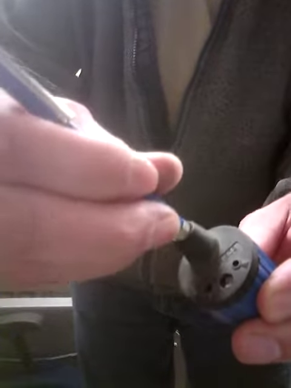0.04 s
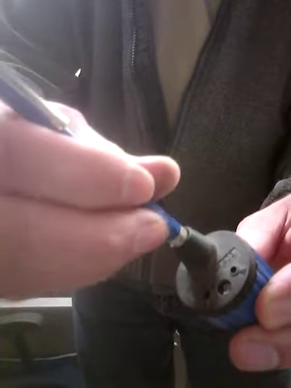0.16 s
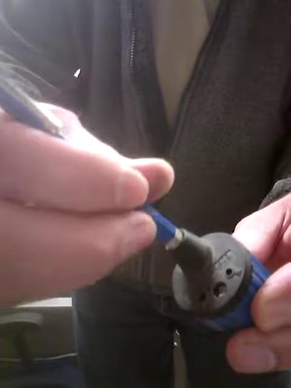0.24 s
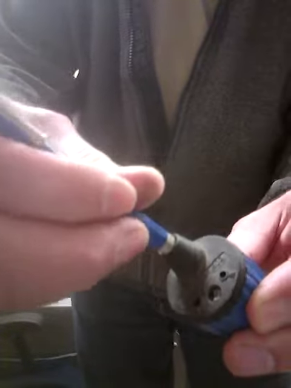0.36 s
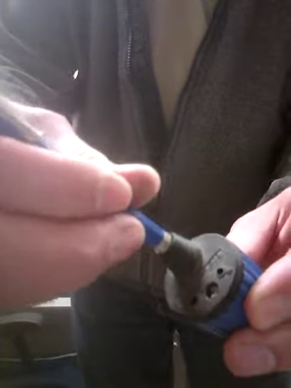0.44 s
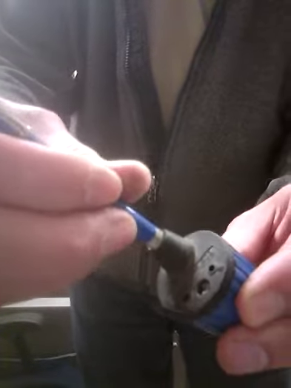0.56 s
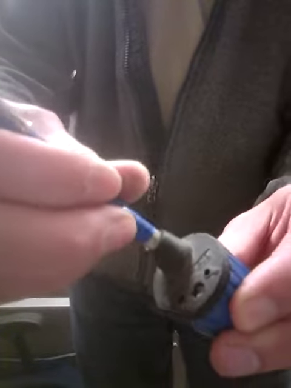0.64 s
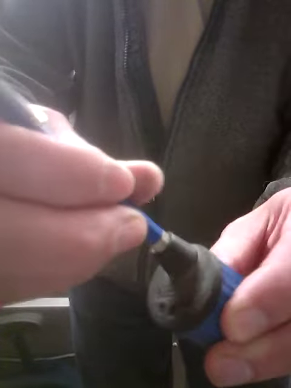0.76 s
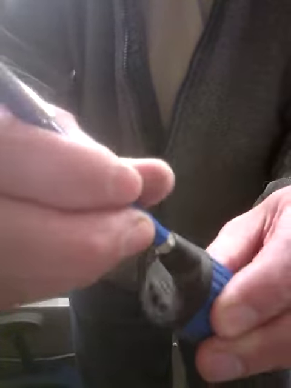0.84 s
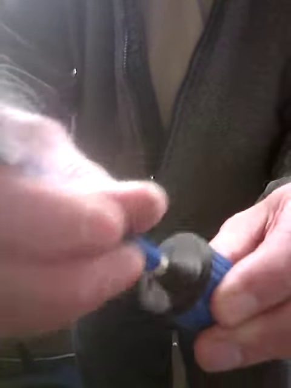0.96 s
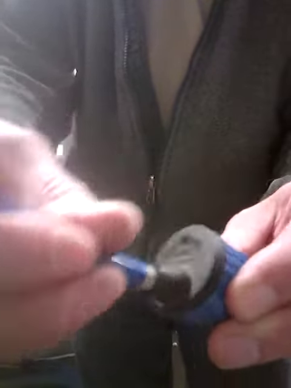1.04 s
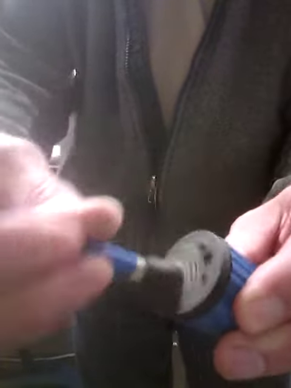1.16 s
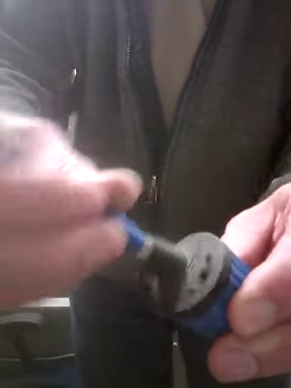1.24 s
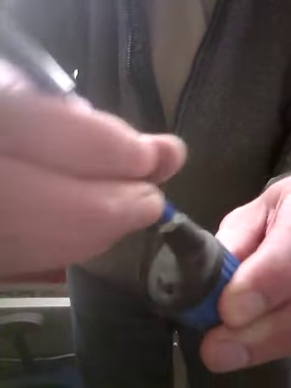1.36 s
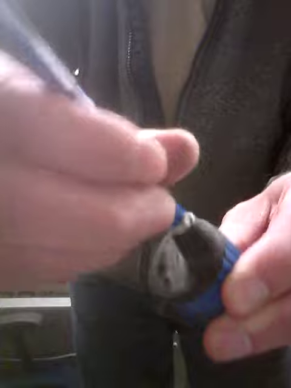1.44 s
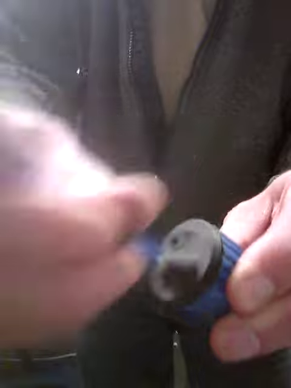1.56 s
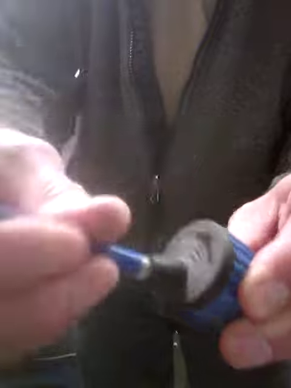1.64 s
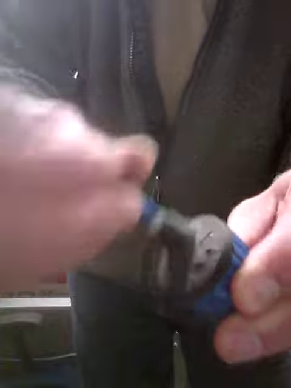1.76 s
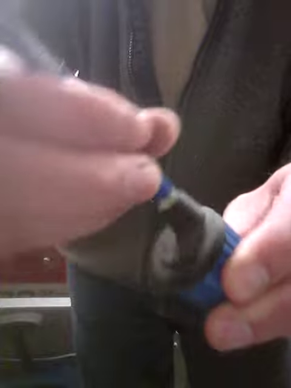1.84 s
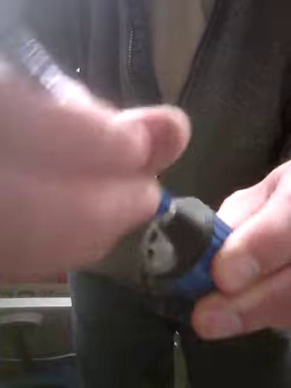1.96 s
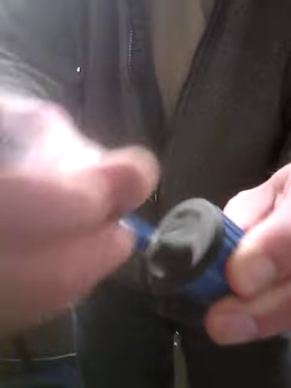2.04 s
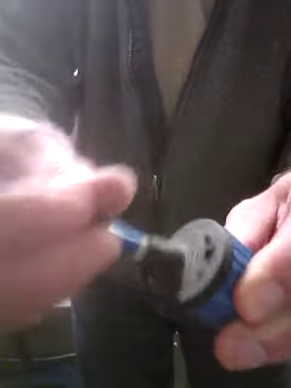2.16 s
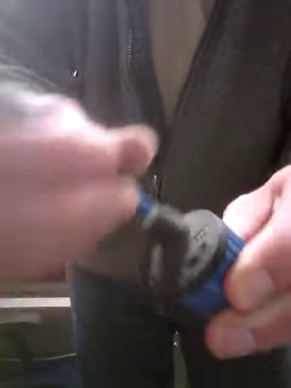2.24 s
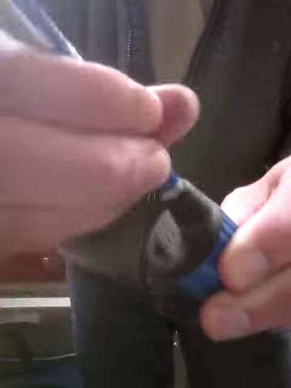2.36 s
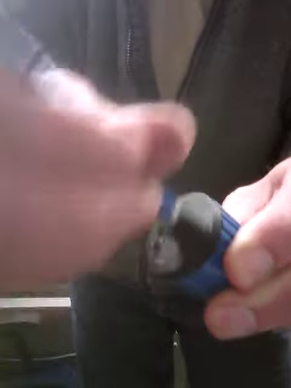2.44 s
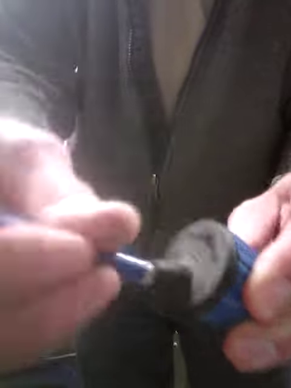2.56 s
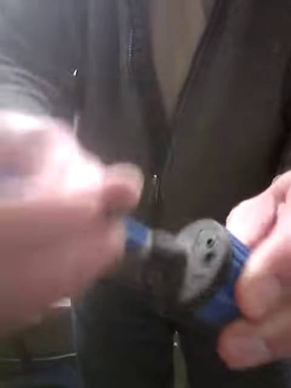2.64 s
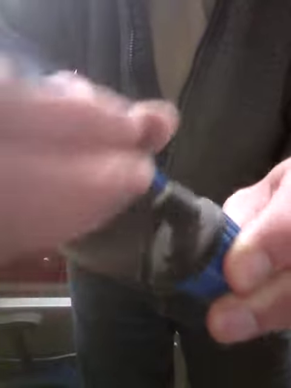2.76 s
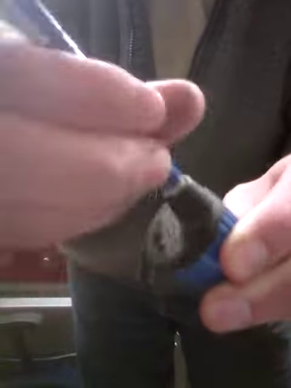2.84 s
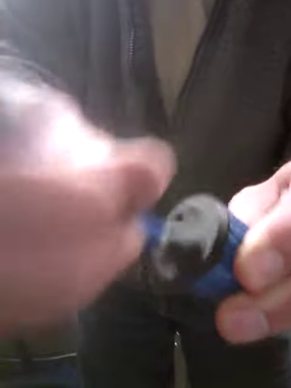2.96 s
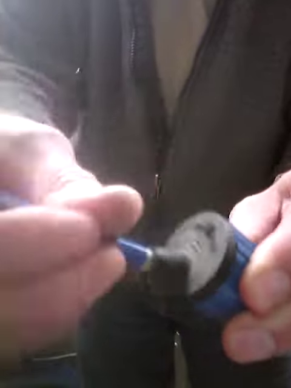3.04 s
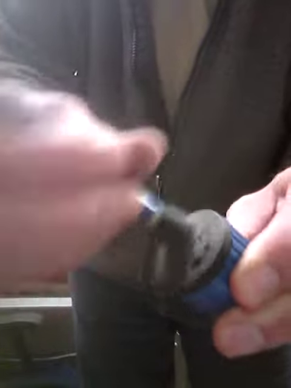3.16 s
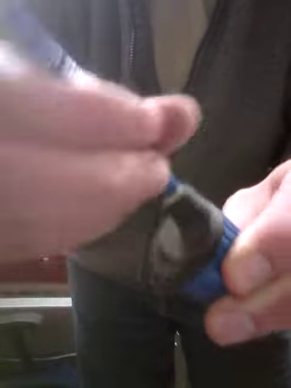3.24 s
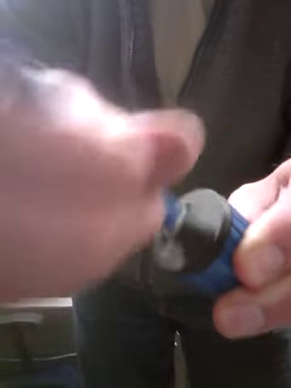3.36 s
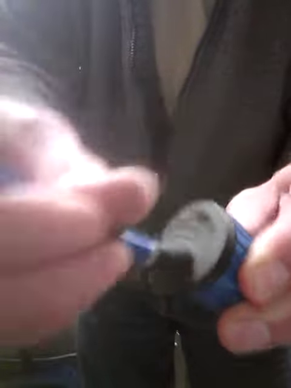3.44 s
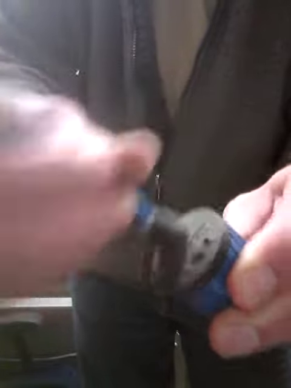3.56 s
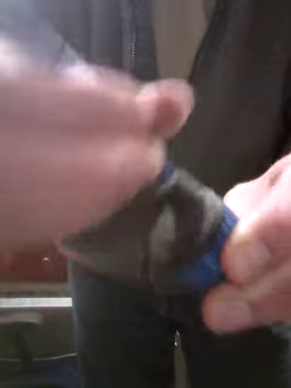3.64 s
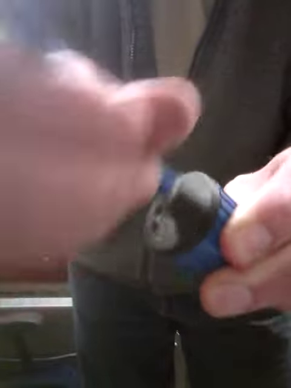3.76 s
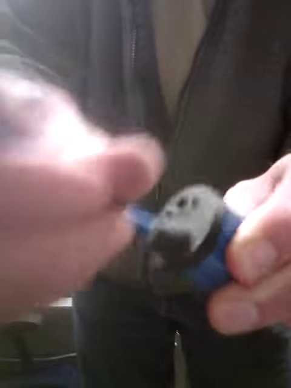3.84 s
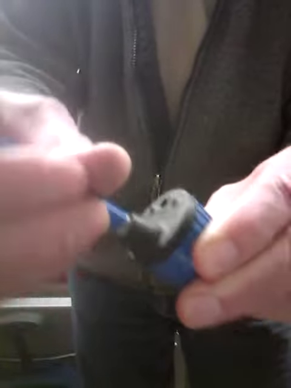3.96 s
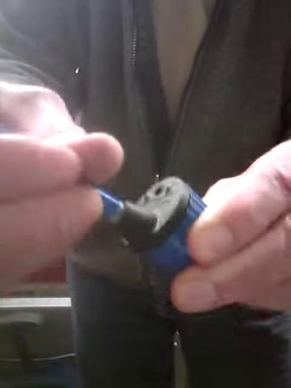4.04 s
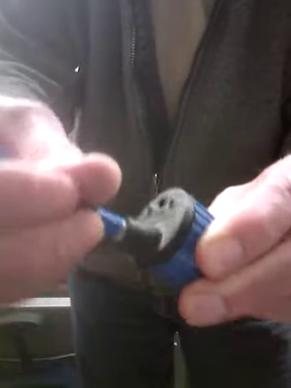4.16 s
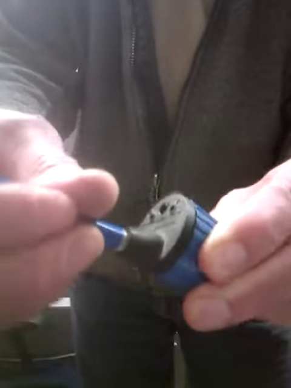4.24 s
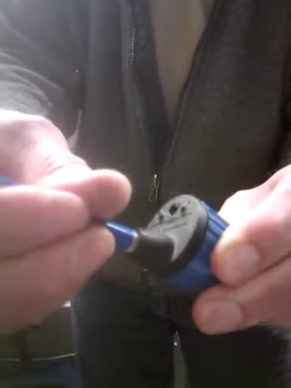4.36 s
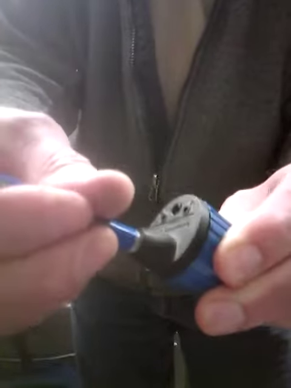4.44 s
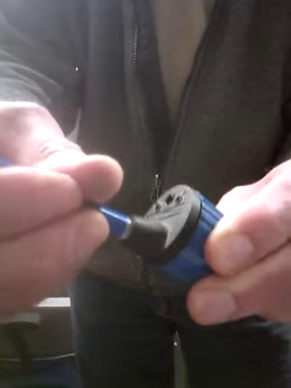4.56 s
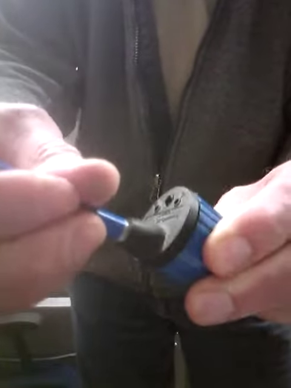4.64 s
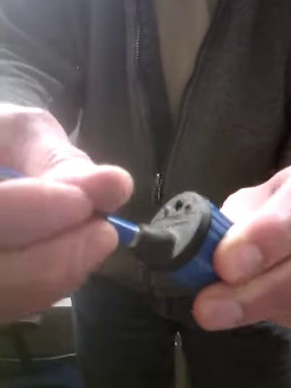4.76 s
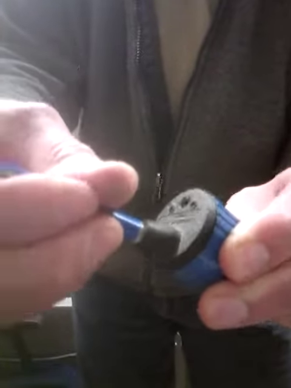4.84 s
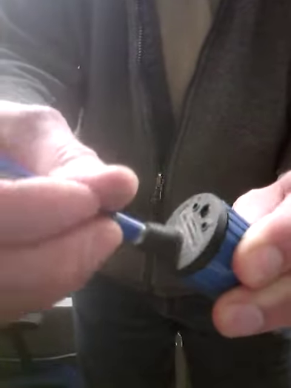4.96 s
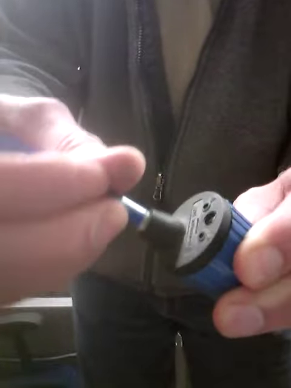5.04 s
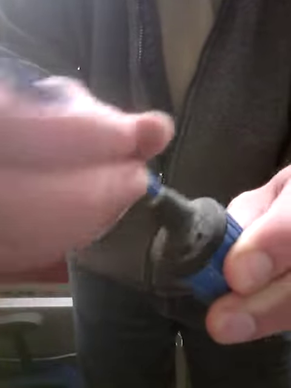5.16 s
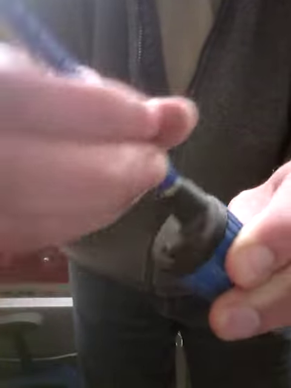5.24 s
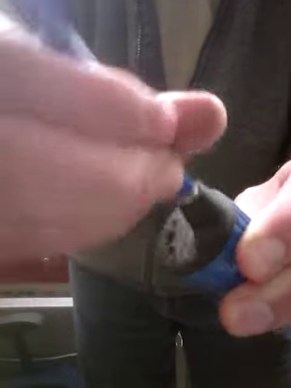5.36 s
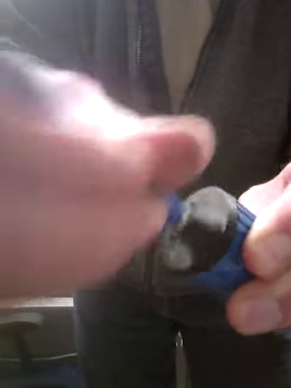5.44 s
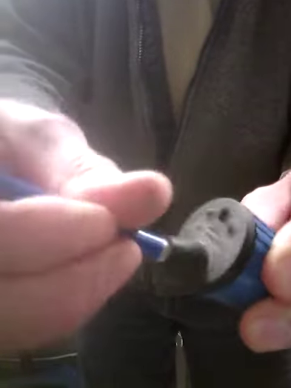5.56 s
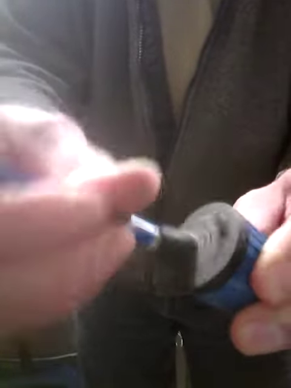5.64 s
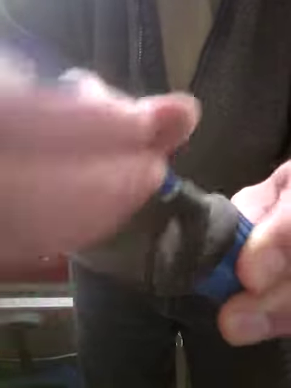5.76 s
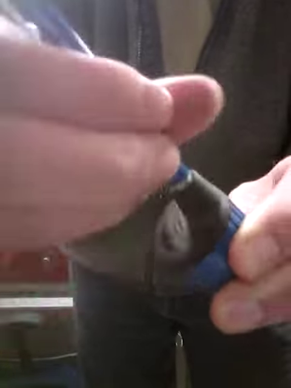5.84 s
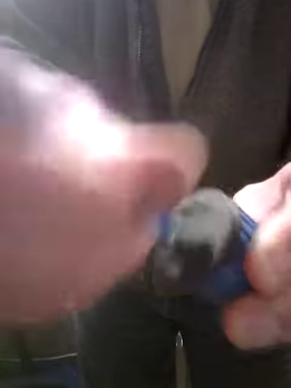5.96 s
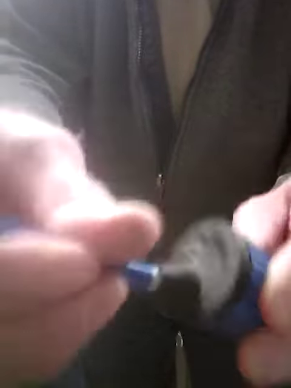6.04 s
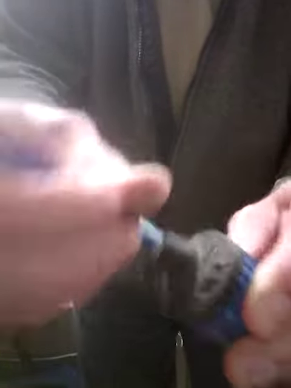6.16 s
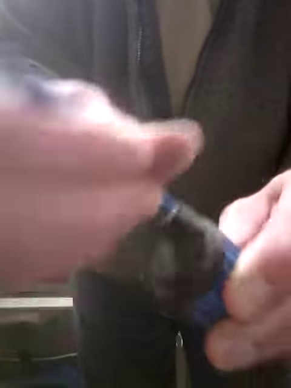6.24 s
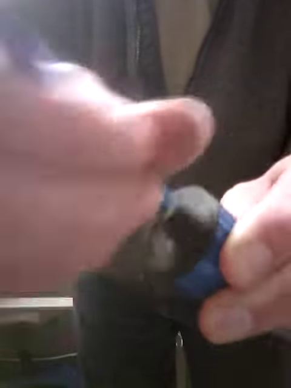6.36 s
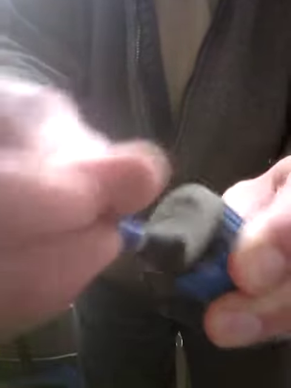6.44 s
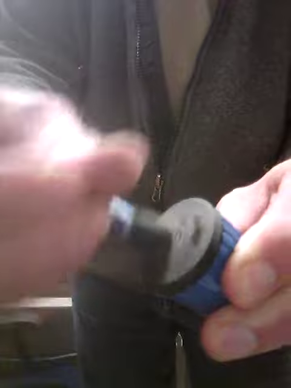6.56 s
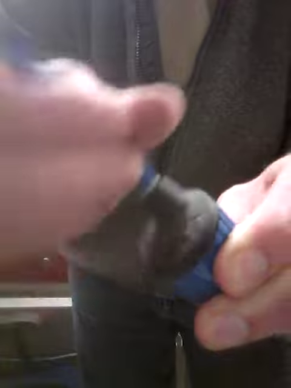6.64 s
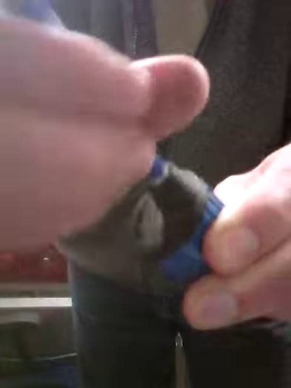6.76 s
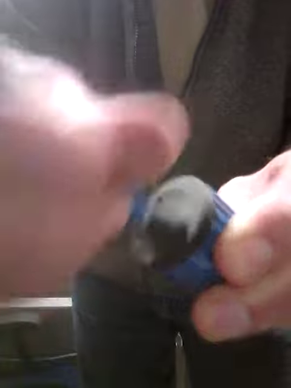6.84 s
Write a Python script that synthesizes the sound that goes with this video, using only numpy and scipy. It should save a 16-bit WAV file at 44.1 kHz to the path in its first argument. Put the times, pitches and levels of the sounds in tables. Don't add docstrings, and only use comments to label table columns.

```python
import sys
import numpy as np
from scipy import signal
from scipy.fft import rfft, irfft, next_fast_len
from scipy.io import wavfile
from scipy.ndimage import uniform_filter1d, map_coordinates

SR = 44100
rng = np.random.default_rng(int(sys.argv[2]) if len(sys.argv) > 2 else 0)


def invert_db(x):
    u = np.asarray(x, float) / 20
    return 10 ** u


def wrap_up_sound(samples):
    columns = np.atleast_2d(samples).T
    tamed = np.clip(columns, -1, 1)
    steps = np.round(tamed * 32767).astype(np.int16)
    wavfile.write(sys.argv[1], SR, steps)


N = 304290
SPLIT = np.array([.5, -.5])[:, None]


def unit(x):
    return x / np.sqrt(np.mean(x ** 2) + 1e-20)


def along(points, hz):
    f, v = np.transpose(points)
    return np.interp(np.log(hz + 1), np.log(f + 1), v)


def curves(rows):
    s, *cols = np.transpose(rows)
    return [np.interp(np.arange(N) / SR, s, c) for c in cols]


def wobble(rate):
    knots = rng.standard_normal(int(N * rate / SR) + 4)
    return map_coordinates(knots, [np.arange(N) * rate / SR])


def filtered(x, response):
    m = next_fast_len(N + SR // 2)
    return irfft(rfft(x, m) * response(np.fft.rfftfreq(m, 1 / SR)), m)[..., :N]


def ports(pair, alike, lead):
    turn = lambda hz: np.arccos(np.clip(along(alike, hz), -1, 1)) / 2
    mid, side = filtered(pair, lambda hz: np.array([np.cos(turn(hz)), np.sin(turn(hz))]))
    half = lambda hz: np.exp(.5j * np.interp(hz, *np.transpose(lead)))
    return filtered(np.array([mid + side, mid - side]), lambda hz: np.array([half(hz), 1 / half(hz)]))


# (frequency [Hz], level [dB per Hz])
AIR = [(15, -60), (36, -52), (49, -12.5), (91, -10), (123, -5.5), (157, -6), (277, -8.5), (438, -13.5),
       (1130, -15.5), (1560, -18.5), (2600, -21), (3410, -17), (4230, -16), (5250, -27), (9500, -38.5),
       (15900, -41.5)]
# (frequency [Hz], left-right likeness)
AIR_ALIKE = [(60, 0.14), (130, 0.7), (290, 0.33), (640, 0.14), (1410, -0.31), (3100, 0.2), (6820, -0.17),
             (15000, 0.12)]
# (time [s], level [dB])
AIR_DB = [(0.0, -90), (0.48, -79), (2.02, -64), (3.69, -66.5), (4.19, -72.5), (6.9, -64.5)]


def room_air():
    colour = lambda hz: invert_db(along(AIR, hz))
    air = unit(filtered(rng.standard_normal((2, N)), colour))
    rumble = unit(filtered(rng.standard_normal((2, N)), lambda hz: colour(hz) / (1 + (hz / 450) ** 4)))
    rumble_db = curves(AIR_DB)[0] + 1.7 + 2.5 * wobble(4.6)
    hiss = invert_db(-63.5) * air + invert_db(rumble_db) * rumble
    return ports(hiss, AIR_ALIKE, [(0, 0), (20000, 0)]) * invert_db([[-0.5], [0.5]])


def tone(hz, db):
    return np.sqrt(2) * invert_db(db) * np.sin(2 * np.pi * np.cumsum(hz) / SR)


# (time [s], frequency [Hz], level [dB])
ENGINE = [(0.0, 82.4, -83), (0.19, 90.7, -72), (0.9, 93.6, -56.5), (1.35, 95, -61.5), (2.15, 95.4, -64),
          (2.32, 97.2, -59), (2.55, 99, -64), (3.86, 101.3, -70.5), (4.04, 97, -88), (4.34, 104.7, -84),
          (4.98, 103.8, -68.5), (5.07, 110.3, -85), (5.48, 106.1, -68), (5.73, 94.2, -78), (5.9, 95.8, -68),
          (6.67, 87, -73), (6.9, 97.5, -68)]
# (time [s], frequency [Hz], level [dB])
DRONE = [(0.0, 163, -69), (0.3, 165.4, -76), (0.52, 171.7, -90), (2.55, 166, -77), (2.72, 163.6, -63),
         (3.05, 164.4, -69.5), (3.25, 162.7, -74), (3.55, 164.2, -67.5), (4.15, 165, -72.5),
         (4.5, 162, -87), (6.75, 157, -85), (6.9, 157.7, -74)]


def engine():
    return tone(*curves(ENGINE)) + tone(*curves(DRONE))


# (frequency [Hz], level [dB], unsteadiness [Hz])
WHINE = [(4360, -79, 9), (3670, -83, 30), (82, -73, 3), (231, -84, 6), (275, -85, 6)]


def whine():
    thin = sum(tone(hz + drift * wobble(25), db + 1.6 * wobble(6.6)) for hz, db, drift in WHINE)
    return np.array([0.7 * thin, 1.16 * np.roll(thin, 40)])


# (time [s], peak [dB], lowest [Hz], ring [Hz], decay [s])
TICKS = [
    (0.2516, -58, 2830, 3620, 0.004),
    (0.666, -54.5, 2800, 4400, 0.004),
    (4.054, -46.5, 1000, 4400, 0.0013),
    (4.0722, -52, 2500, 4400, 0.0012),
    (4.2516, -53, 3050, 3840, 0.0036),
    (4.702, -59, 1980, 4100, 0.003),
    (4.985, -51, 1230, 2340, 0.004),
]


def ticks():
    out, t = np.zeros((2, N)), np.arange(SR // 40) / SR
    for s, db, low_hz, hz, decay in TICKS:
        swell = (1 - np.exp(-8 * t / decay)) * np.exp(-t / decay)
        puff = rng.standard_normal((2, len(t))) * swell
        wall = signal.butter(6, [low_hz, 1.15 * hz], "band", fs=SR, output="sos")
        ring = signal.sosfilt(wall, puff + 2 * puff[0])
        out[:, round(s * SR):][:, :len(t)] += invert_db(db + 4) * ring / np.abs(ring).max()
    return out


# (frequency [Hz], t60 [s])
ROOM = [(500, 0.32), (2000, 0.18), (4000, 0.16), (12000, 0.11)]


def walls(x):
    hz, t, z = signal.stft(rng.standard_normal((2, SR // 3)), SR, nperseg=256)
    tail = signal.istft(z * invert_db(-60 * t / along(ROOM, hz)[:, None]), SR, nperseg=256)[1]
    late = np.pad(x, ((0, 0), (150, 0)))
    return signal.fftconvolve(late, tail / np.linalg.norm(tail[0]), axes=1)[:, :N]


# (start [s], stop [s], resting scrape [dB], fine dust [dB], cup walls [dB])
SPELLS = [(0.71, 1.078, -45.5, -25, -8.5), (1.068, 2.004, -46.5, -19.5, -6), (2.008, 3.835, -42, -19, -8),
          (3.873, 4.1, -66.5, -14, -19), (4.847, 4.861, -47, -37, -13), (4.86, 4.911, -40.5, -22.5, -6),
          (4.982, 5.001, -46, -25, -11), (5.013, 5.027, -43, -22, -6), (5.057, 5.074, -65, -24, -5.5),
          (5.088, 5.616, -41.5, -23, -8.5), (5.617, 6.032, -42.5, -22, -8.5), (6.029, 7.2, -42, -21.5, -10)]


def contact():
    t = np.arange(N) / SR
    start, stop, rest_db, dust_db, cup_db = np.transpose(SPELLS)[:, :, None]
    touch_s, lift_s = 0.0017, 0.0082
    gate = np.clip((t - start) / touch_s, 0, 1) * np.exp(-np.maximum(t - stop, 0) / lift_s)
    latest = np.maximum(np.searchsorted(start[:, 0], t) - 1, 0)
    return invert_db(rest_db[latest, 0]), gate.max(axis=0), dust_db[latest, 0], cup_db[latest, 0]


def close_to(start, stop):
    return slice(round(start * SR), round(stop * SR))


# (time [s], half length [s], level [dB], brightness [dB])
SHOVES = [(0.752, 0.027, -36, -14), (0.807, 0.051, -39.5, 0), (0.907, 0.059, -35.5, 5),
          (1.034, 0.031, -32, -9), (1.27, 0.11, -33, -13), (1.342, 0.12, -35.5, 5.5),
          (1.587, 0.083, -30.5, -0.5), (1.752, 0.066, -26.5, -8), (1.863, 0.047, -33.5, -2.5),
          (2.025, 0.057, -28, 2), (2.154, 0.031, -31.5, -4), (2.273, 0.11, -33.5, -2.5),
          (2.469, 0.086, -30, -4.5), (2.658, 0.11, -33.5, -4.5), (2.784, 0.032, -29, 5.5),
          (2.923, 0.067, -31.5, 1.5), (3.04, 0.073, -29.5, 6.5), (3.136, 0.035, -39.5, -16),
          (3.225, 0.068, -27.5, -1.5), (3.364, 0.041, -31.5, -4), (3.48, 0.058, -30.5, 6.5),
          (3.561, 0.036, -29.5, -2), (3.646, 0.068, -28, 3), (3.802, 0.061, -34.5, -2.5)]
SHOVES_AGAIN = [(5.122, 0.053, -33.5, 2), (5.252, 0.066, -31, -3), (5.439, 0.035, -40, -2),
                (5.54, 0.041, -32.5, -3), (5.68, 0.039, -28, 3), (5.808, 0.16, -31, 3.5),
                (5.964, 0.033, -28.5, -10), (6.11, 0.059, -27.5, -9.5), (6.208, 0.041, -25.5, -5),
                (6.31, 0.043, -32.5, -1.5), (6.387, 0.034, -26, -4), (6.452, 0.036, -30, -4),
                (6.579, 0.068, -26, 5.5), (6.71, 0.085, -29, 1), (6.858, 0.076, -30.5, -6)]


def shoves(rest):
    t = np.arange(N) / SR
    power, tint = rest ** 2, np.zeros(N)
    for s, half, db, bright_db in SHOVES + SHOVES_AGAIN:
        near = close_to(s - .3, s + .3)
        bell = (invert_db(db) * np.exp(-((t[near] - s) / half) ** 2)) ** 2
        power[near] += bell
        tint[near] += bell * bright_db
    return 10 * np.log10(power), tint / power - 0.3


# (time [s], half length [s], depth [dB])
SKIPS = [(0.873, 0.0041, 35), (0.923, 0.0033, 12), (1.248, 0.0062, 22), (1.291, 0.0069, 41),
         (1.383, 0.008, 25), (1.51, 0.0046, 34), (1.731, 0.0071, 31), (1.795, 0.015, 36),
         (1.967, 0.0057, 32), (2.246, 0.0087, 39), (2.708, 0.0073, 26), (3.159, 0.0044, 28),
         (3.201, 0.0033, 20), (3.583, 0.0034, 23), (5.17, 0.0079, 11), (5.209, 0.0062, 26),
         (5.23, 0.0075, 13.5), (5.722, 0.0055, 38), (5.754, 0.0032, -4), (6.149, 0.016, 26),
         (6.175, 0.011, 24), (6.626, 0.0064, 16), (6.655, 0.007, 9)]
# (time [s], depth [dB])
GAPS = [(0.8249, 12), (0.9004, 10.0), (0.9511, 8), (0.9701, 7), (0.9983, 6), (1.1024, 10.0), (1.1137, 10.0),
        (1.208, 10.0), (1.2237, 16), (1.2641, 10.0), (1.319, 26), (1.3594, 3), (1.3704, 11.0), (1.4011, 14),
        (1.4155, 4), (1.4404, 12.0), (1.469, 12.0), (1.4885, 18), (1.7643, 12), (1.781, 17.0),
        (1.8144, 19.0), (1.8416, 16.0), (1.8528, 12.0), (2.1873, 11.0), (2.202, 21), (2.2184, 18),
        (2.2316, 13.0), (2.2727, 21), (2.3648, 13), (2.588, 9), (2.599, 11.0), (2.6747, 16), (2.7342, 16.0),
        (2.7471, 16), (2.861, 17), (2.9502, 4), (3.075, 17), (3.1841, 9), (3.6211, 13), (5.139, 13),
        (5.1945, 18), (5.571, 4), (5.6025, 13), (5.7494, 27), (5.767, 16.0), (5.818, 16), (5.8302, 13.0),
        (5.909, 21), (6.135, 16), (6.1878, 12.0), (6.2403, 18), (6.2686, 16), (6.281, 14), (6.2964, 12.0),
        (6.5067, 4), (6.5308, 14), (6.643, 13), (6.6627, 18)]
# (start [s], stop [s], level [dB])
BITES = [(0.765, 0.779, -14), (1.07, 1.121, -9), (2.686, 2.697, 7), (2.696, 2.711, -18), (2.716, 2.726, 6),
         (3.047, 3.07, -4), (3.114, 3.15, 8.5), (3.209, 3.223, 3.5), (3.49, 3.485, 5), (5.1, 5.11, 1.5),
         (5.164, 5.175, -19), (6.537, 6.54, 4.5), (6.618, 6.63, -22)]
# (first tooth [s], last tooth [s], gap [s], depth [dB])
RATTLES = [(0.742, 0.81, 0.014, 3.5), (0.883, 0.937, 0.012, 3.5), (1.03, 1.06, 0.0059, 3),
           (1.2, 1.278, 0.016, 3), (1.312, 1.35, 0.011, 7), (1.3633, 1.477, 0.01423, 6.5),
           (1.568, 1.602, 0.012, 3.5), (1.835, 1.85, 0.015, 4), (2.019, 2.086, 0.013, 0.5),
           (2.513, 2.529, 0.0072, 6), (2.91, 2.948, 0.0064, -3.5), (5.2352, 5.273, 0.015, 5.5),
           (5.532, 5.574, 0.0155, 5), (5.799, 5.845, 0.014, 0.5), (6.373, 6.38, 0.0065, 4.5),
           (6.445, 6.458, 0.0072, 3)]


def interruptions():
    t, broken_db = np.arange(N) / SR, np.zeros(N)
    for s, half, depth_db in SKIPS:
        near = close_to(s - .1, s + .1)
        broken_db[near] -= 0.36 * depth_db * np.exp(-((t[near] - s) / half) ** 2)
    for s, depth_db in GAPS:
        near = close_to(s - .03, s + .03)
        broken_db[near] -= 1.04 * depth_db * np.exp(-((t[near] - s) / 0.0013) ** 2)
    for start, stop, bite_db in BITES:
        broken_db[close_to(start, stop)] += bite_db
    broken_db = uniform_filter1d(broken_db, size=90)
    for first, last, gap, depth_db in RATTLES:
        near = close_to(first - .75 * gap, last + .75 * gap)
        broken_db[near] += depth_db * np.cos(2 * np.pi * (t[near] - first) / gap)
    return broken_db


def chatter():
    return unit(invert_db(1.13 * wobble(200) + 0.44 * wobble(70) + 0.18 * wobble(27)))


def bumps(times, sizes, rise, fall):
    t = np.arange(-SR // 50, SR // 50) / SR
    shape = np.where(t < 0, np.exp(-(t / rise) ** 2), np.exp(-(t / fall) ** 2))
    spikes = np.bincount(np.clip((times * SR).astype(int), 0, N - 1), sizes, N)
    return np.abs(signal.fftconvolve(spikes, shape, "same"))


# (time [s], level [dB])
CATCH = [(0.896, -24), (1.048, -24), (1.214, -20), (1.2709, -17), (1.303, -18.5), (1.4994, -23),
         (1.743, -14.5), (1.76, -16.5), (1.775, -21), (1.787, -19.5), (1.8064, -17.5), (1.823, -18),
         (1.8586, -21), (2.211, -18.5), (2.225, -19.5), (2.239, -18), (2.257, -18), (2.266, -26),
         (2.2816, -14.5), (2.521, -27), (2.681, -19), (2.7276, -16.5), (2.7418, -22), (2.7596, -19.5),
         (3.037, -19), (3.141, -31), (3.5475, -24), (3.629, -21)]
CATCH_AGAIN = [(5.0957, -21.5), (5.158, -27), (5.1838, -22), (5.2015, -20.5), (5.218, -21), (5.733, -22),
               (5.76, -17), (5.776, -15.5), (5.835, -21), (5.9731, -23), (6.114, -18), (6.142, -21),
               (6.162, -19), (6.183, -18.5), (6.4284, -20.5), (6.467, -20.5), (6.5381, -26), (6.572, -20),
               (6.636, -17.5), (6.6923, -29)]
# (time [s], level [dB])
NUDGES = [(3.839, -21), (3.855, -27.5), (3.884, -39), (4.8633, -23.5), (4.8718, -24), (4.882, -25.5),
          (4.8968, -25.5), (5.0243, -24.5), (5.036, -36), (5.626, -25), (5.642, -20)]
# (time [s], level [dB])
TEETH = [(0.7404, -25), (0.7831, -30), (0.8037, -30), (0.8144, -29), (0.833, -26.5), (0.8631, -33),
         (0.884, -28.0), (0.9055, -27), (0.9346, -23), (0.9544, -33.0), (0.9753, -27.5), (1.0284, -34),
         (1.092, -36), (1.1106, -34), (1.1683, -28), (1.1955, -27), (1.234, -25.8), (1.256, -18),
         (1.327, -21), (1.336, -21), (1.345, -19), (1.3647, -22), (1.3772, -23), (1.3924, -33),
         (1.4084, -36), (1.419, -37), (1.4327, -32), (1.4447, -25), (1.4625, -33), (1.4795, -37),
         (1.5716, -31), (1.6016, -31), (1.6975, -30), (1.718, -23), (1.8346, -26), (1.848, -21),
         (1.8674, -23), (1.907, -24), (1.918, -27.5), (2.0614, -18), (2.073, -26), (2.0825, -24),
         (2.0953, -29), (2.109, -25.5), (2.178, -24), (2.194, -22), (2.2997, -21), (2.3361, -27.7),
         (2.348, -24.5), (2.3613, -32), (2.3823, -23), (2.443, -17), (2.472, -29), (2.5313, -27),
         (2.5927, -22), (2.6416, -22.5), (2.666, -31), (2.8442, -32)]
TEETH_AGAIN = [(2.883, -24), (2.9075, -29), (2.915, -26), (2.968, -25), (3.0072, -20), (3.0248, -22),
               (3.08, -30), (3.17, -20), (3.1926, -24), (3.3517, -24), (3.414, -26), (3.44, -22),
               (3.4544, -18), (3.5156, -20), (3.568, -21), (3.5882, -19), (3.6138, -27), (3.6829, -26),
               (3.7124, -32), (3.7462, -30.2), (3.7942, -25.5), (5.0652, -43), (5.1473, -24), (5.2347, -34),
               (5.2666, -35), (5.2804, -32), (5.3153, -32), (5.3334, -28), (5.3541, -32), (5.406, -27),
               (5.432, -25.5), (5.439, -25.2), (5.4688, -27), (5.5035, -26), (5.5621, -36), (5.5783, -30),
               (5.5938, -35), (5.6068, -42), (5.702, -26), (5.7953, -23), (5.8124, -37), (5.824, -18.5),
               (5.851, -18), (5.9023, -27.5), (6.0452, -32), (6.2468, -29), (6.26, -21.5), (6.2728, -27.7),
               (6.2899, -25), (6.3026, -28), (6.3367, -27.9), (6.3904, -21), (6.484, -20.5), (6.524, -28),
               (6.607, -20.7), (6.6535, -24), (6.8617, -26), (6.8845, -23)]


def teeth():
    s, db = np.transpose(CATCH + CATCH_AGAIN + NUDGES)
    at, tooth_db = np.transpose(TEETH + TEETH_AGAIN)
    hard = bumps(s, invert_db(db - 8.0), rise=0.0038, fall=0.0029)
    hard = hard + bumps(at, invert_db(tooth_db - 7.0), rise=0.0023, fall=0.0017)
    thud = bumps(s, invert_db(db - 14.5), rise=0.0067, fall=0.001)
    stick = bumps(s - .006, np.ones(len(s)), rise=0.0027, fall=0.0042)
    return hard, thud, np.minimum(stick, 1)


def grit(spiky_db, patchy_db, narrow_db):
    z = signal.stft(rng.standard_normal((2, N)), nperseg=256)[2]
    luck = rng.standard_normal(z.shape[1:])
    wide = uniform_filter1d(uniform_filter1d(luck, size=5, axis=0), size=16, axis=1)
    narrow = uniform_filter1d(uniform_filter1d(luck[::-1], size=2, axis=0), size=7, axis=1)
    colour = invert_db(patchy_db * unit(wide) + narrow_db * unit(narrow))
    noise = signal.istft(z * colour, nperseg=256)[1][:, :N]
    return unit(noise * invert_db(spiky_db * wobble(2500)))


def ringing(x, spectrum):
    level_db = np.maximum(along(spectrum, np.fft.rfftfreq(4096, 1 / SR)), -60)
    ceps = irfft(np.log(invert_db(level_db)))
    ceps[1:2048] *= 2
    ceps[2049:] = 0
    h = irfft(np.exp(rfft(ceps)))[:1024]
    return signal.fftconvolve(x, h[None] / np.linalg.norm(h), axes=1)[:, :N]


def tilted(x, tilt_db, hz):
    upper = filtered(x, lambda f: 1 / (1 + (hz / (f + 1)) ** 12))
    return upper * invert_db(tilt_db / 2) + (x - upper) * invert_db(-tilt_db / 2)


def evened(x, share, size):
    power = np.abs(uniform_filter1d(x ** 2, size, axis=1)) + 1e-9
    return unit(x / power ** (share / 2))


# (frequency [Hz], level [dB per Hz])
GRIT = [(1350, -38), (2300, -18.5), (2850, -9), (3550, -1), (4000, 4), (4450, 6), (4900, -1.5),
        (5330, -9.5), (5920, -14), (6640, -46.5), (7200, -30.5), (9360, -66), (15800, -120)]


def cutter(crumbs, pressure, bright_db):
    bright = tilted(ringing(crumbs, GRIT), bright_db, hz=4260)
    return evened(bright, share=0.38, size=150) * pressure


TOPS = [0.2, 0.7, 1.2, 1.69, 2.14, 2.61, 3.054, 3.461, 3.87, 4.5, 5.06, 5.632, 6.12, 6.52, 6.92]


def crank(table):
    angle = np.interp(np.arange(N) / SR, TOPS, np.arange(len(TOPS))) % 1
    share, *cols = np.transpose(table)
    return [np.interp(angle, share, c) for c in cols]


def follows(grind_db, share, floor_db):
    return (share - 1) * np.maximum(grind_db + 34, floor_db)


# (frequency [Hz], level [dB per Hz])
CUP = [(260, -33), (450, -21.5), (620, -22.5), (729, -11), (823, -6.5), (1000, -13), (1180, -6),
       (1430, -6.5), (1810, 3), (2240, 1.5), (2800, -11), (3640, -6), (6160, -120)]
# (share of the turn, walls [dB])
OPENING = [(0.0, -1.5), (0.06, 1), (0.2, 0), (0.32, 0.5), (0.45, -0.5), (0.56, 0.5), (0.7, -1), (0.82, 0),
           (0.94, -0.5), (0.999, -3)]


def cup(crumbs, pressure, cup_db, grind_db):
    cup_db = cup_db + crank(OPENING)[0] + follows(grind_db, share=0.53, floor_db=-9)
    return ringing(crumbs * pressure * invert_db(cup_db + 1.89 + 1.26 * wobble(9)), CUP)


# (frequency [Hz], level [dB per Hz])
DUST = [(4000, -14.5), (6800, 0.5), (7120, -0.5), (7950, 1), (9130, -11), (10300, -12), (11900, -5),
        (13000, -9.5), (13700, -10), (14800, -3), (15200, -0.5), (15900, -17.5)]


def dust(crumbs, pressure, dust_db, grind_db, bright_db):
    dust_db = dust_db + follows(grind_db, share=0.84, floor_db=-7) + 0.27 * bright_db
    return ringing(crumbs * pressure * invert_db(dust_db + 4.0 + 1.53 * wobble(12)), DUST)


# (frequency [Hz], level [dB per Hz])
EDGE = [(4700, -31.5), (5400, -4.5), (5800, 7.5), (6200, 7.5), (6800, -38)]
# (time [s], level [dB])
GRIP = [(0.75, 8.5), (0.95, -10), (1.1, 3), (1.4, 2), (1.55, 7.5), (1.75, -1.5), (2.4, 2), (2.8, -7),
        (3.02, 3), (3.25, 0), (3.55, -1), (3.7, -4), (3.82, 5.5), (5.35, 2), (5.95, -10), (6.3, 3.5),
        (6.6, -7), (6.9, 7.5)]


def edge(crumbs, pressure, bright_db):
    edge_db = -17.5 + curves(GRIP)[0] + 0.77 * bright_db + 1.5 * wobble(8)
    return ringing(crumbs * pressure * invert_db(edge_db), EDGE)


def circling(pair, lead_us):
    shift = lead_us * 1e-6 * SR / 2
    return np.array([map_coordinates(x, [np.arange(N) + d], order=3) for x, d in zip(pair, (shift, -shift))])


# (frequency [Hz], part both ports hear alike)
SHARED = [(500, 0.71), (1200, 0.93), (2200, 0.42), (4000, 0.77), (6000, 0.5), (9000, 0.12), (15000, 0.18)]
# (frequency [Hz], phase [rad])
LEAD = [(0, -0.5), (1030, 1.66), (1640, 1.87), (2100, 3), (2930, 7.5), (4130, 10), (5770, 11), (6030, 13.5),
        (6370, 11), (7240, 11.5), (10500, 17.5), (10900, 28), (12400, 29), (14000, 36), (16400, 25)]
# (frequency [Hz], left-right [dB])
FRONT = [(200, 5), (380, 4), (700, 3), (1290, 2), (1800, -0.5), (2380, 4), (3800, 3), (4400, 7),
         (8120, 2.5), (15000, 6)]
# (share of the turn, left-right low [dB], left-right high [dB], extra left lead [us])
ROUND = [(0.0, -3, 5, -48), (0.06, -0.5, 2.5, -48), (0.3, -1, 1.1, -39.5), (0.55, 0, 1.1, -1),
         (0.72, 4, 1.5, -6), (0.88, -0.5, -1.5, 27), (0.97, -2, 1.5, 35), (0.999, 0, 9, -11)]
# (time [s], left-right of the highs [dB])
LEAN = [(0.7, -0.5), (0.92, -7), (1.15, -3.5), (1.3, 0), (1.5, -5.5), (1.7, -0.5), (5.4, 0), (5.6, -0.5)]


def at_ports(x):
    low_db, high_db, lead_us = crank(ROUND)
    heard = ports(x, SHARED, LEAD)
    heard = filtered(heard, lambda hz: invert_db(SPLIT * along(FRONT, hz)) * hz ** 2 / (hz ** 2 + 150 ** 2))
    low = filtered(heard, lambda hz: 1 / (1 + (hz / 2700) ** 6))
    high = circling(heard - low, lead_us)
    return low * invert_db(SPLIT * (low_db - 3.5)) + high * invert_db(SPLIT * (high_db - 3.0 + curves(LEAN)[0]))


def pointer():
    rest, gate, dust_db, cup_db = contact()
    grind_db, bright_db = shoves(rest)
    hard, thud, stick = teeth()
    scrape = gate * invert_db(interruptions()) * invert_db(grind_db - 3.0) * chatter()
    scrape = scrape * invert_db(-6 * stick)
    crumbs = grit(spiky_db=3.0, patchy_db=1.43, narrow_db=2.0)
    pressure = np.hypot(scrape, hard)
    body = cutter(crumbs, pressure, bright_db) + edge(crumbs, pressure, bright_db)
    body = body + cup(crumbs, np.hypot(scrape, thud), cup_db, grind_db)
    body = body + dust(crumbs, np.hypot(scrape, 0.72 * hard), dust_db, grind_db, bright_db)
    return at_ports(body + snaps())


# (time [s], level [dB])
SNAPS = [
    (2.2646, -23),
    (5.8208, -27),
    (5.0195, -26),
]
# (frequency [Hz], level [dB], t60 [s])
CUTTER = [(1820, -17, 0.17), (3440, 2, 0.031), (4000, 4, 0.03), (4530, -15, 0.075), (5460, -12, 0.027)]


def snaps():
    out, t = np.zeros((2, N)), np.arange(SR // 20) / SR
    modes = sum(invert_db(db - 60 * t / (0.51 * t60)) * np.sin(2 * np.pi * hz * t) for hz, db, t60 in CUTTER)
    ring = modes * (1 - np.exp(-t / 0.00022))
    for s, db in SNAPS:
        out[0, round(s * SR):][:len(t)] += invert_db(db + 4.5) * ring
    return out


def scene():
    near = pointer() + ticks()
    return near + invert_db(-13.0) * walls(near) + room_air() + engine() + whine()


def roll_off(x):
    return signal.sosfilt(signal.butter(12, 15790, fs=SR, output="sos"), x)


def record(dry):
    rounded = dry / (1 + np.abs(dry / .3) ** 3) ** (1 / 3)
    mix = filtered(rounded, lambda hz: hz < 15790) - .0006
    return roll_off(mix)


dry = scene()
out = record(dry)
wrap_up_sound(out)
```